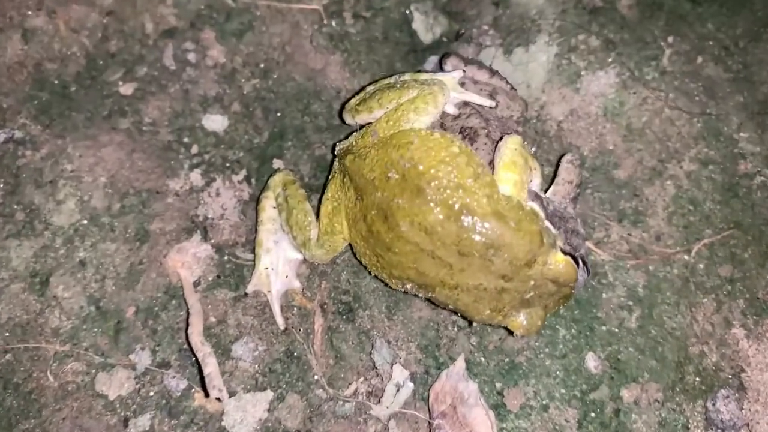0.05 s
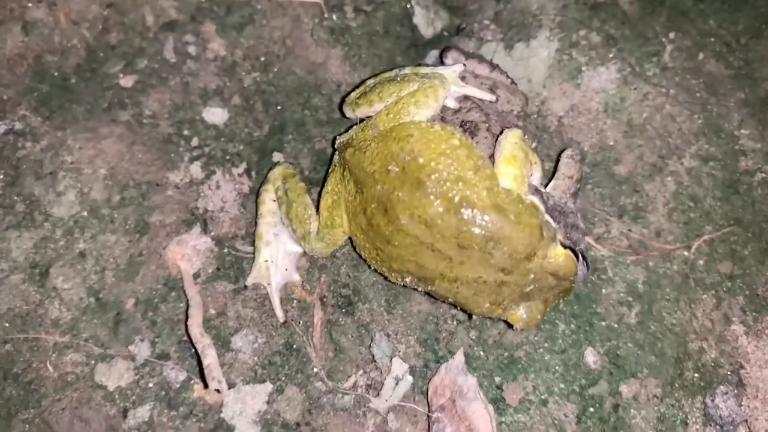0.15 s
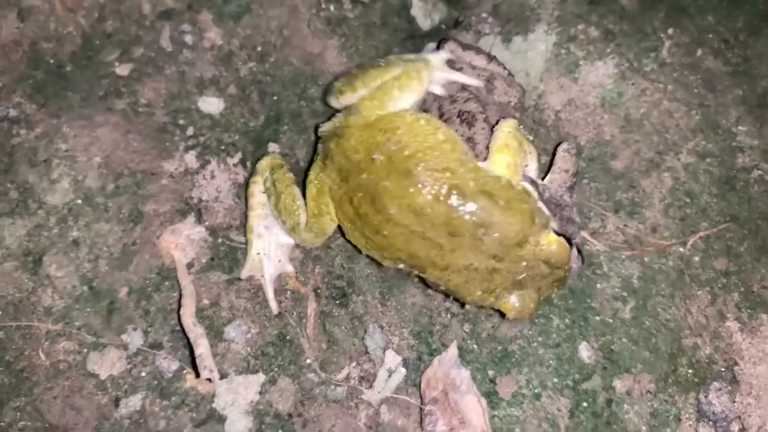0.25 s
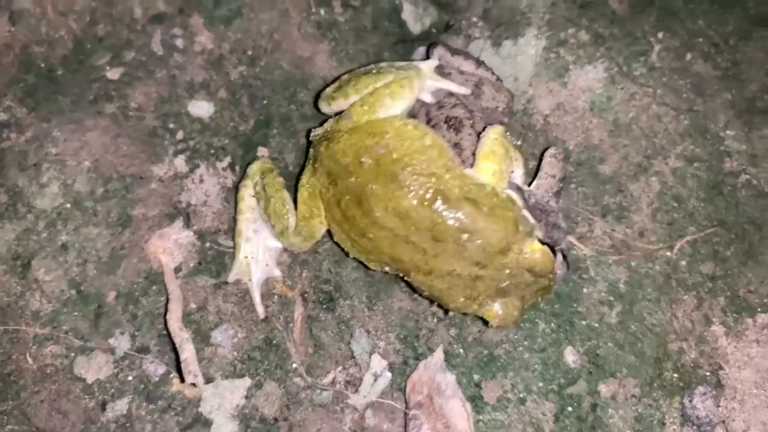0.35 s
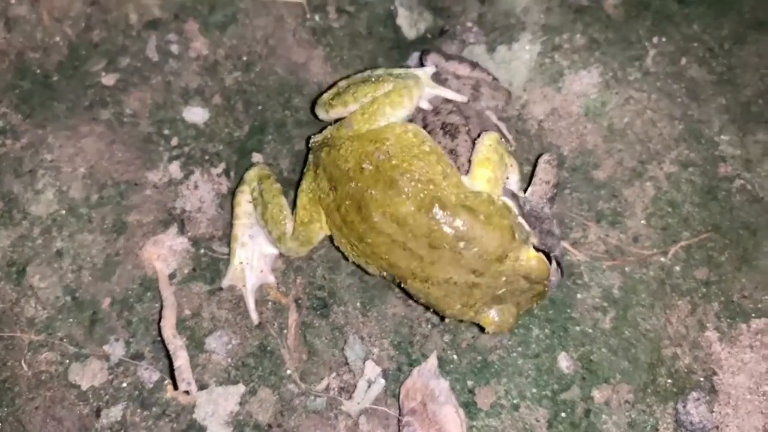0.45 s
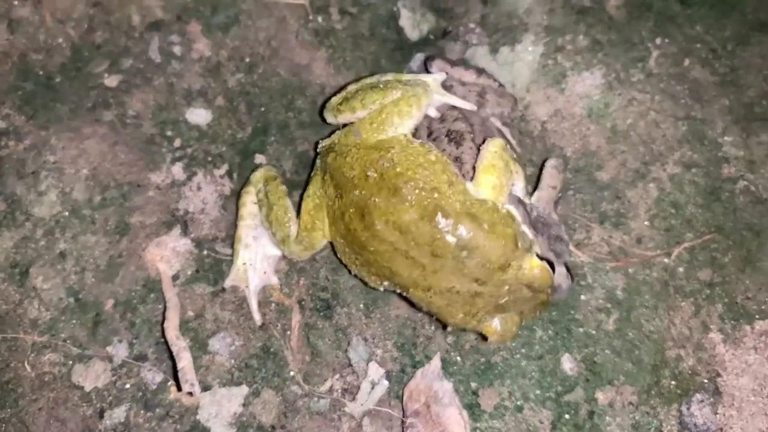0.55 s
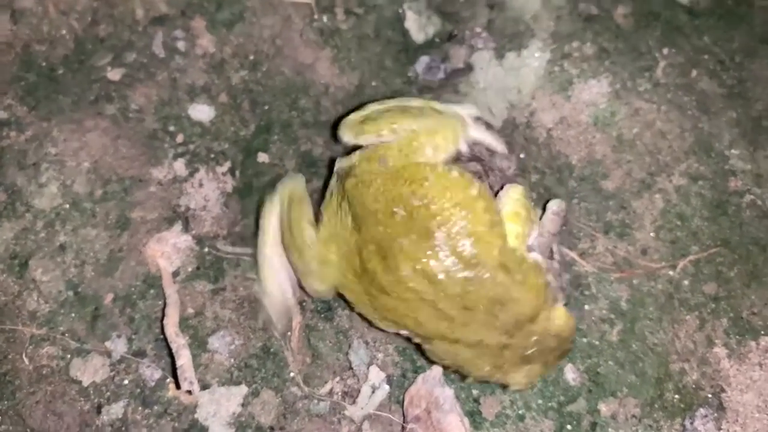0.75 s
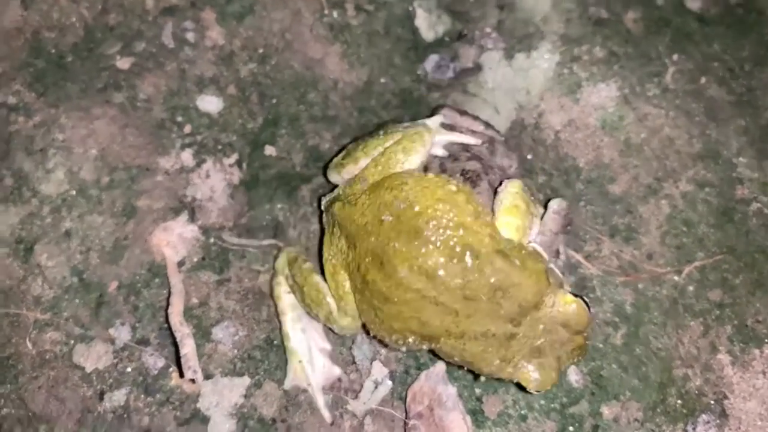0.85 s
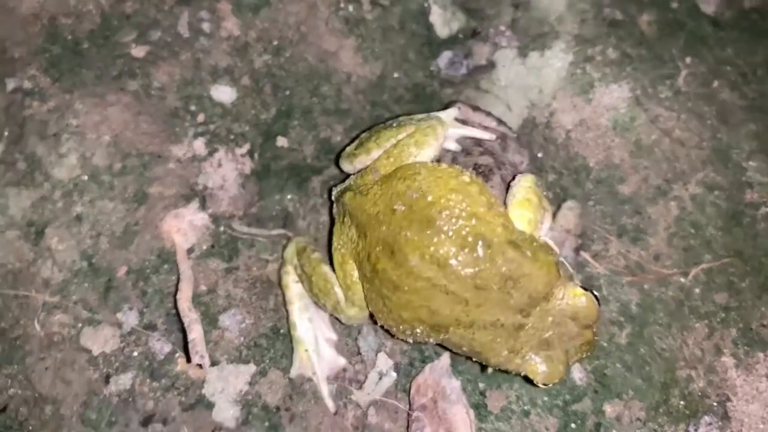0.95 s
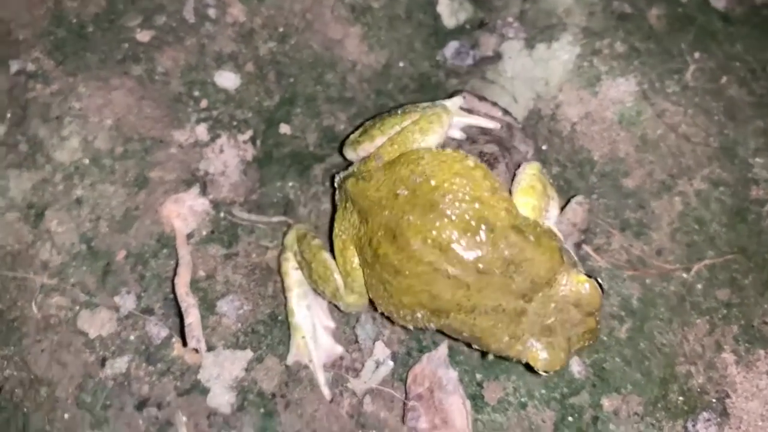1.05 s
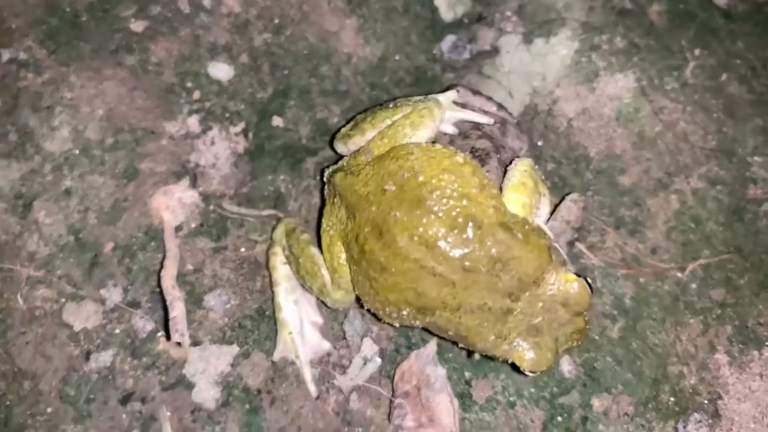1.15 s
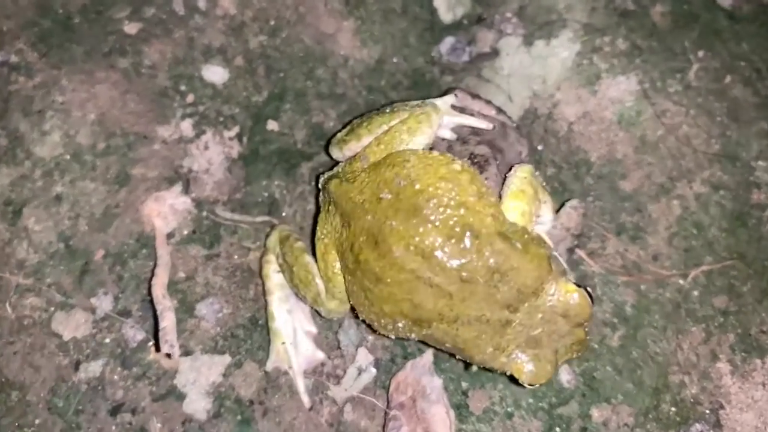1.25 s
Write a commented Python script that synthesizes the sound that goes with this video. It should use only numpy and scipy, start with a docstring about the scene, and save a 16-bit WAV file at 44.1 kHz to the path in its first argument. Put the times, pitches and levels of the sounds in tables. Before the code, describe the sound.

Short rapid squeaky toad croak, ending in a sagging whine, above soft cricket hiss and low rumble

```python
"""Night bed throughout: far traffic and machinery rumble as shaped noise; crickets throb as resonant noise.
Then a toad close to a phone gives a quick run of squeaky chirps: short harmonic stacks that sag in pitch, with
faint fluttering, a wet tick of the mouth and delayed ground echoes. The last chirp is drawn out along its own
pitch and level curves. Late on, a thin high insect chorus, itself resonant noise, swells above the bed."""
import sys
import numpy as np
from scipy import signal
from scipy.fft import rfft, irfft
from scipy.io import wavfile
from scipy.ndimage import uniform_filter1d

SR = 44100
rng = np.random.default_rng(int(sys.argv[2]) if len(sys.argv) > 2 else 0)


def output_pcm(signal):
    """Save a mono or channel-first signal as 16-bit PCM at the path in sys.argv[1].

    Samples are clipped to [-1, 1] before scaling.
    """
    pcm = np.clip(np.atleast_2d(signal).T, -1, 1) * 32767
    wavfile.write(sys.argv[1], SR, np.round(pcm).astype(np.int16))


N = 57330
TIME = np.arange(N) / SR  # s
BIN_HZ = np.arange(N // 2 + 1) * SR / N
TOP_HZ = 15750  # upper limit of the partials and of the phone


def undb(db):
    """Decibel law: 20 dB is a factor of ten in amplitude."""
    return 10 ** (np.asarray(db) / 20)


def level(x, db):
    """RMS normalisation: scale a signal to a root-mean-square level in dB."""
    return x * undb(db) / np.sqrt(np.mean(x ** 2))


def read(table, hz):
    """Logarithmic frequency scale: interpolate a (frequency, value) table on it."""
    table_hz, value = np.array(table).T
    return np.interp(np.log(np.maximum(hz, 1)), np.log(table_hz), value)


def level_curve(table):
    """Amplitude envelope: gain interpolated in dB from a (time, level) table."""
    time, db = np.array(table).T
    return undb(np.interp(TIME, time, db))


def walk(rate):
    """Low-passed random modulation: values held 1 / rate s, then slewed twice; spread near 1."""
    hold = int(SR / rate)
    steps = np.repeat(rng.standard_normal(N // hold + 1), hold)
    slewed = uniform_filter1d(uniform_filter1d(steps, hold), hold)
    return 1.76 * slewed[:N]


def bands(peaks):
    """Resonance: white noise through steep peaks given as (frequency, width 12 dB down, level)."""
    gain = sum(undb(db) / (1 + (2 * (BIN_HZ - hz) / width) ** 2) ** 2 for hz, width, db in peaks)
    return irfft(rfft(rng.standard_normal(N)) * gain, N)


def coloured(table, db):
    """Spectral shaping: noise in half-octave bands that swell together and flicker alone."""
    swell_db, flicker_db = .3, 2.
    spectrum = rfft(rng.standard_normal(N)) * undb(read(table, BIN_HZ))
    place = 2 * np.log2(np.maximum(BIN_HZ, 1) / 20)  # half octaves above 20 Hz
    swell, out = walk(2), 0
    for k in range(20):
        crossfade = np.clip(1 - abs(place - k), 0, 1)
        band = irfft(spectrum * crossfade, N)
        out = out + band * undb(swell_db * swell + flicker_db * walk(12.38))
    return level(out, db)


def night_air():
    """Stereo decomposition: traffic rumble and night noise as in-phase and opposed parts."""
    # noise common to both ports: (frequency [Hz], relative density [dB per Hz])
    common = [(15, -58), (25, -5.5), (64, -0.5), (136, -3), (216, -9.5), (271, -7), (516, -15), (579, -19),
              (762, -24.5), (936, -25), (2040, -30.5), (6000, -47.5), (7800, -47.5), (13200, -120)]
    # noise opposed between the ports: (frequency [Hz], relative density [dB per Hz])
    opposed = [(15, -49), (25, -26), (64, -4.5), (107, -11.5), (183, -7), (445, -10.5), (495, -4.5),
               (567, -13.5), (614, -10), (782, -11.5), (4260, -28.5), (6550, -39), (7300, -41),
               (15500, -55)]
    return coloured(common, -45), coloured(opposed, -51)


def machinery():
    """Narrow-band noise: far machinery hums in slender bands that waver together."""
    # hum bands: (frequency [Hz], width [Hz], relative level [dB])
    hums = [(78.4, 15, 1.5), (134.3, 17, -0.5), (272.9, 10.7, -5.5), (410.4, 9.6, -10), (782.4, 47, -17)]
    waver_db = 3
    return level(bands(hums) * undb(waver_db * walk(5)), -53.5)


def high_insects():
    """Envelope shaping: faint high resonant noise dips, then swells late."""
    # high chorus: (frequency [Hz], width [Hz], relative level [dB])
    katydid = [(12050, 340, 6), (13250, 910, 1.5), (11060, 1400, -4)]
    # its course: (time [s], RMS level [dB])
    katydid_level = [(0, -79), (.45, -86), (.8, -87), (.95, -77.5), (1.1, -76.5), (1.3, -82.5)]
    return level(bands(katydid), 0) * level_curve(katydid_level)


def crickets():
    """Amplitude modulation: a far chorus throbs at random, a nearer cricket pulses evenly."""
    # far chorus: (frequency [Hz], width [Hz], relative level [dB])
    chorus = [(7276, 400, 1), (6850, 750, -5), (7640, 770, -6.5)]
    # one nearer cricket: (frequency [Hz], width [Hz], relative level [dB])
    solo = [(7040, 186, 3), (7460, 530, -7.5)]
    chorus_db, throb_db, side_db = -63.5, 1.5, -25  # side relative to the chorus
    solo_first_s, solo_period_s, solo_depth_db = .054, .0895, 5.5
    far = level(undb(throb_db * walk(30.25)) * bands(chorus), chorus_db)
    beat = undb(solo_depth_db * np.cos(2 * np.pi * (TIME - solo_first_s) / solo_period_s))
    near = level(beat * bands(solo), -64)
    side = level(bands(chorus), chorus_db + side_db)
    return far + near, side


def fold_flutter():
    """Resonant noise: between chirps the vocal folds keep fluttering faintly."""
    # flutter bands: (frequency [Hz], width [Hz], relative level [dB])
    flutter = [(1600, 400, 0), (3200, 700, -9)]
    # course of the flutter: (time [s], RMS level [dB])
    flutter_level = [(.25, -100), (.268, -56), (.284, -44), (.315, -48), (.345, -46), (.385, -43),
                     (.41, -44), (.46, -50), (.48, -100)]
    return level(bands(flutter), 0) * level_curve(flutter_level)


def rasp(gain):
    """Turbulence noise: air rasps past the folds, most at the onset."""
    settle_s, settle_db = .003, -11  # settling time at full gain
    band = signal.butter(3, (1900, 4200), "band", fs=SR, output="sos")
    air = signal.sosfilt(band, rng.standard_normal(len(gain)))
    settled = np.clip(np.cumsum(gain) / gain.max() / (settle_s * SR), 0, 1)
    return level(air, -20) * undb(settle_db * settled)


def voice(hz, gain, second_db, middle_db, shrill_db):
    """Source and filter: the folds' harmonic series coloured by a fixed response over frequency, higher
    partials breathier."""
    # response over frequency: (frequency of the partial [Hz], level re fundamental [dB])
    partial_response = [(2700, -12), (3400, -18), (5000, -32), (6700, -28.5), (8400, -36.5), (10000, -45),
                        (11800, -36), (13200, -30), (14500, -48), (15300, -35)]
    shrill_hz, breath_db = 9500, -16
    phase = 2 * np.pi * (np.cumsum(hz) / SR + rng.random())
    out = np.sin(phase) + rasp(gain)
    for k in range(2, 11):
        upper_db = np.where(k * hz > shrill_hz, shrill_db, middle_db)
        db = read(partial_response, k * hz) + (second_db if k == 2 else upper_db)
        breath = 1 + undb(breath_db) * k * uniform_filter1d(rng.standard_normal(len(hz)), size=24)
        partial = np.sin(k * phase + k * k) * (k * hz < TOP_HZ)
        out += undb(db) * breath * partial
    return out * gain


def mouth_tick():
    """Gaussian wave packet: a wet tick of the mouth."""
    tick_s, tick_hz, decay_s = .3071, 2900, .0004
    u = TIME - tick_s
    return undb(-25) * np.exp(-(u / decay_s) ** 2) * np.sin(2 * np.pi * tick_hz * u)


def toad():
    """Frequency and amplitude modulation: each chirp snaps on sharp, settles, sags and stops."""
    # chirps: (start [s], length [s], mid-chirp pitch [Hz], initial level [dB], level change over the chirp [dB],
    #          2nd partial offset [dB], middle partials offset [dB], shrill top offset [dB])
    chirps = [(0.2296, 0.0072, 1588, -18.5, -15, 7.5, -6, 3.5), (.2871, .0081, 1700, -9.5, -.5, 0, 0, 0),
              (.3082, .006, 1530, -31, -4, 5, 3, 9), (0.33, 0.0051, 1528, -15, -6, 2.5, -12, 3),
              (0.3491, .0048, 1584, -16.5, -2.5, 3.5, -21, 3),
              (0.3673, 0.0061, 1612, -11.5, -5.5, 3.5, -4.5, 2),
              (0.3885, .0060, 1629, -22, -1.5, 7, 0, 8.5)]
    # the last, drawn-out chirp: (time [s], pitch [Hz], level [dB])
    whine = [(.4080, 1700, -44), (.4105, 1640, -16), (.412, 1560, -19), (.4135, 1540, -17),
             (.416, 1500, -22), (.4215, 1440, -27), (.426, 1422, -26.5), (.432, 1415, -21),
             (.436, 1386, -21), (.440, 1345, -25), (.4425, 1330, -32), (.4445, 1320, -50)]
    attack_s, release_s, settle_s = .0009, .0009, .0013
    onset_sharp, sag_per_s = .06, 2.5  # fractions of the pitch
    shimmer = undb(.9 * walk(600))  # irregular loudness
    jitter = 1 + .004 * walk(500)  # irregular pitch
    out = np.zeros(N)
    for start, length, hz, peak_db, fade_db, *partials_db in chirps:
        at = slice(int((start - .005) * SR), int((start + length + .012) * SR))
        u = TIME[at] - start
        rise = 1 / (1 + np.exp(-4 * u / attack_s))
        fall = np.exp(-np.maximum(u - length, 0) / release_s)
        gain = rise * fall * undb(peak_db + fade_db * np.clip(u / length, 0, 1)) * shimmer[at]
        sharp = onset_sharp * np.exp(-np.maximum(u, 0) / settle_s)
        pitch = hz * (1 + sharp - sag_per_s * (u - length / 2))
        out[at] += voice(pitch * jitter[at], gain, *partials_db)
    time, hz, db = np.array(whine).T
    at = slice(int(time[0] * SR), int(time[-1] * SR))
    pitch = np.interp(TIME[at], time, hz) * jitter[at]
    gain = undb(np.interp(TIME[at], time, db)) * shimmer[at]
    out[at] += voice(pitch, gain, second_db=1, middle_db=-15, shrill_db=4)
    return out + mouth_tick()


def ground_echoes(x):
    """Discrete reflection: ground and stones return delayed, weaker copies."""
    # reflections: (delay [s], level [dB])
    echoes = [(.009, -25), (.014, -27), (.021, -29), (.032, -33)]
    return sum(undb(db) * np.roll(x, int(delay * SR)) for delay, db in echoes)


def ports(x):
    """Interaural-style phase and level difference: a near sound reaches two microphone ports unequally."""
    # phase between the ports: (frequency [Hz], lead of the left port [rad])
    port_phase = [(1400, 2.2), (1700, 2.0), (2800, 3.0), (3250, 1.4), (5000, 2.0), (6700, 0.), (8400, 1.7),
                  (10000, 3.2), (11800, 5.6), (13500, 7.4), (15300, 9.5)]
    pan = undb(1.7 / 2)  # left is 1.7 dB above right
    half_turn = np.exp(.5j * read(port_phase, BIN_HZ))
    left = irfft(rfft(x) * half_turn, N) * pan
    right = irfft(rfft(x) / half_turn, N) / pan
    return np.array([left, right])


def scene():
    """Superposition: the mid and side bed plus the near toad at the two ports."""
    night_mid, night_side = night_air()
    cricket_mid, cricket_side = crickets()
    mid = night_mid + machinery() + high_insects() + cricket_mid
    side = night_side + cricket_side
    call = toad()
    near = call + ground_echoes(call) + fold_flutter()
    return ports(near) + np.array([mid + side, mid - side])


def record(dry):
    """Band limitation: the phone drops the deepest bass and cuts the top."""
    bass_cut = signal.butter(8, 42, "high", fs=SR, output="sos")  # cutoff in Hz
    top_cut = signal.ellip(10, .2, 80, TOP_HZ, fs=SR, output="sos")  # ripple and stopband in dB
    return signal.sosfilt(top_cut, signal.sosfilt(bass_cut, dry))


dry = scene()
out = record(dry)
output_pcm(out)
```